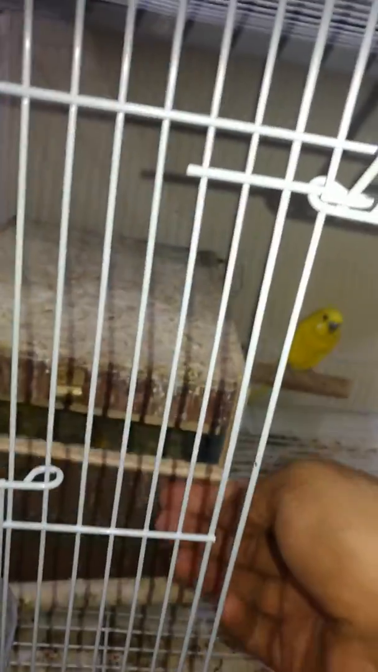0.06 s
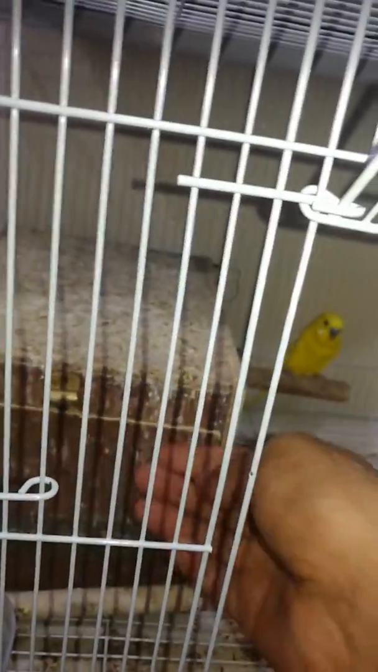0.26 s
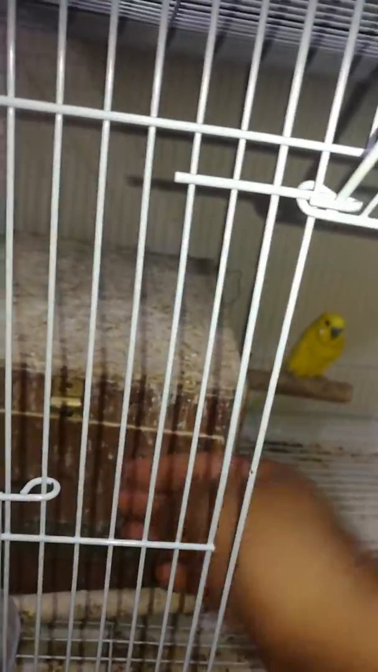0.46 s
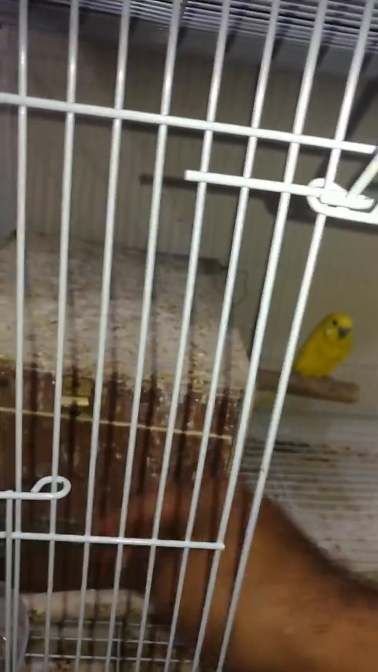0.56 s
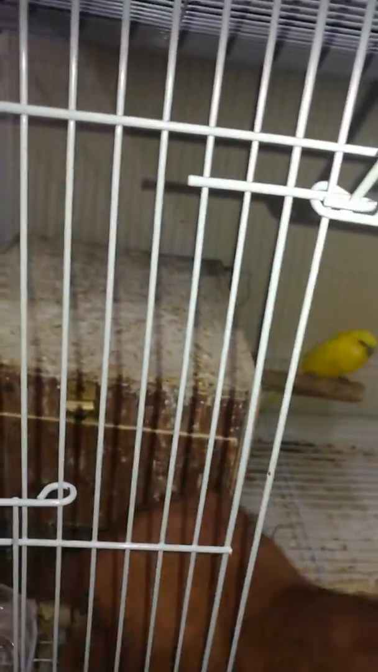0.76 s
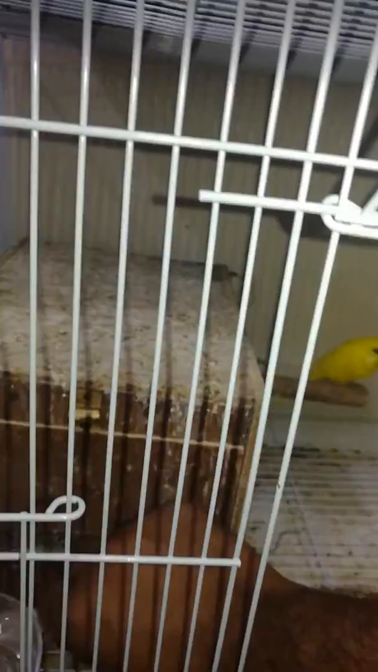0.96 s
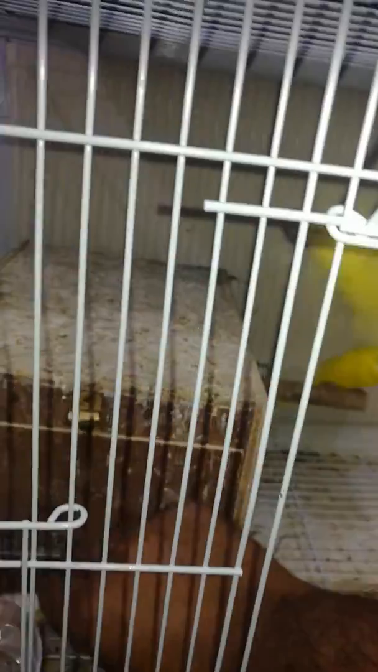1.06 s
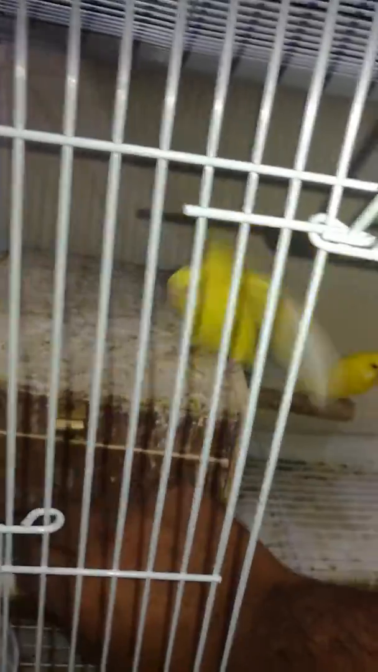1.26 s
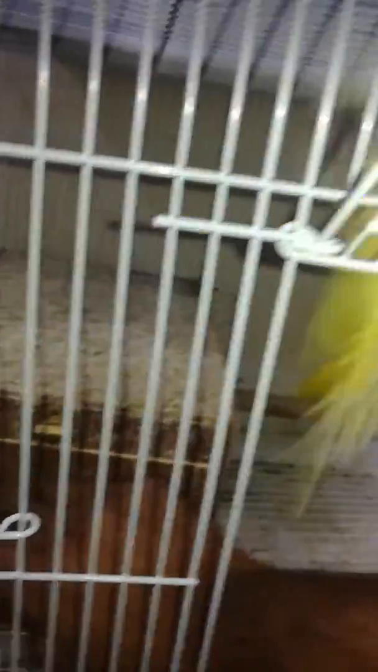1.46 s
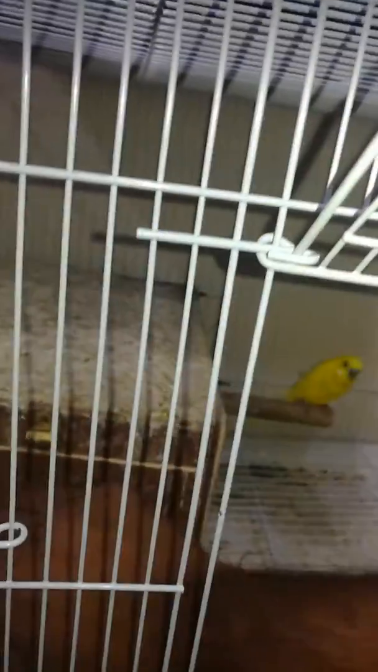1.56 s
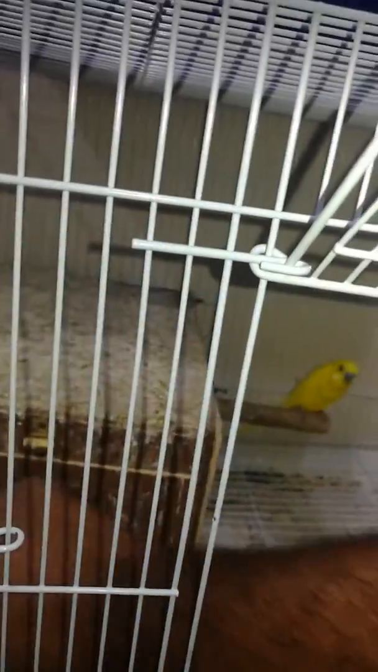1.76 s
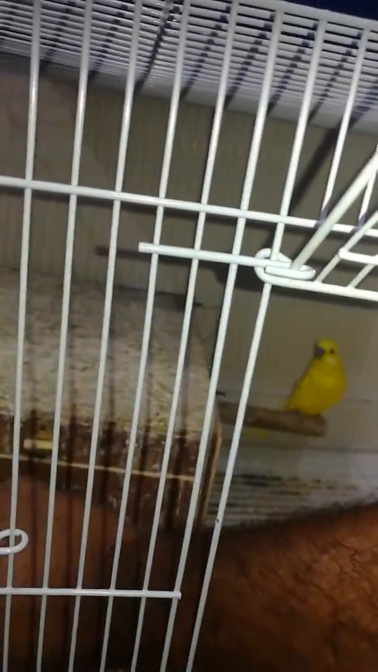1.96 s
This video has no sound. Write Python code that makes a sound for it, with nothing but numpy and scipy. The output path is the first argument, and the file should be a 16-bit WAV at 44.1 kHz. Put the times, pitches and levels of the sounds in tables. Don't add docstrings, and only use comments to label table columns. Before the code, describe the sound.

Wing flutter in a wire cage, heard close and slightly right: bumps on a hollow wooden box, a few weak flaps with air puffs, quick chirps, a dense crackling flurry, then faint wire hum and chirping.

```python
import sys
import numpy as np
from scipy import signal
from scipy.fft import rfft, irfft, next_fast_len
from scipy.io import wavfile
from scipy.ndimage import uniform_filter1d

SR = 44100
rng = np.random.default_rng(int(sys.argv[2]) if len(sys.argv) > 2 else 0)


def file_out(sig):
    cols = np.atleast_2d(sig).T
    lim = np.clip(cols, -1, 1)
    pcm = np.round(lim * 32767).astype(np.int16)
    wavfile.write(sys.argv[1], SR, pcm)


def volts_from_decibels(level):
    exponent = np.asarray(level, float) / 20
    return 10 ** exponent


N = 88200
T = np.arange(N) / SR


def unit(x):
    return x / np.sqrt(np.mean(x ** 2) + 1e-30)


def shape(x, gain_of_hz):
    size = next_fast_len(N + 8192)
    hz = np.maximum(np.fft.rfftfreq(size, 1 / SR), 1)
    return irfft(rfft(x, size) * gain_of_hz(hz), size)[..., :N]


def colour(x, table):
    hz, db = np.array(table, float).T
    return shape(x, lambda f: volts_from_decibels(np.interp(np.log(f), np.log(hz), db)))


def band(x, hz, width_hz):
    return shape(x, lambda f: 1 / (1 + 1j * (f / hz - hz / f) * hz / width_hz))


def band_noise(shape_of, hz, width_hz):
    once = band(rng.standard_normal(shape_of), hz, width_hz)
    return unit(band(once, hz, width_hz))


def walk(rate_hz):
    hold = int(SR / rate_hz)
    steps = np.repeat(rng.standard_normal(N // hold + 1), hold)
    return unit(uniform_filter1d(steps, hold)[:N])


def level(table):
    return volts_from_decibels(np.interp(T, *np.array(table, float).T))


def partial(start_s, level_db, hz, t60_s):
    t = np.maximum(T - start_s, 0)
    return volts_from_decibels(level_db - 60 * t / t60_s) * np.sin(2 * np.pi * hz * t)


def glides(notes, rough, overtone_db):
    warble_hz, beak_hz = 270, 6200
    tone, over = np.zeros((2, N))
    warble, wobble = (unit(band(rng.standard_normal(N), warble_hz, 210)) for _ in range(2))
    for start_s, length_s, start_hz, end_hz, level_db in notes:
        u = np.clip((T - start_s) / length_s, 0, 1)
        cycles = length_s * (start_hz * u + (end_hz - start_hz) * u ** 2 / 2)
        phase = 2 * np.pi * cycles + rough * wobble / 2
        env = volts_from_decibels(level_db - 2) * np.sin(np.pi * u) ** 1.23 * (1 + rough * warble)
        tone += env * np.sin(phase)
        over += env * (np.sin(2 * phase) + 0.31 * np.sin(3 * phase))
    return tone + volts_from_decibels(overtone_db) * band(over, beak_hz, 1670)


def shared_bass(f):
    return 1 / (1 + (f / 280) ** 2)


def place(x, pan_db):
    lag_s = 25 / 44100
    bass = shape(x, shared_bass)
    treble = x - bass
    left = shape(treble, lambda f: np.exp(-2j * np.pi * f * lag_s))
    return bass + np.array([left * volts_from_decibels(pan_db / 2), treble * volts_from_decibels(-pan_db / 2)])


def wide(table):
    noise = rng.standard_normal((3, N))
    apart = shape(noise[1:], lambda f: np.sqrt(1 - shared_bass(f) ** 2))
    return unit(colour(shape(noise[0], shared_bass) + apart, table))


def room(x):
    t60_s, treble_t60_s, split_hz = 0.39, 0.21, 5500
    t = T[:SR // 2]
    noise = rng.standard_normal((2, N))
    dull = shape(noise, lambda f: 1 / (1 + (f / split_hz) ** 2))
    bright = noise - dull
    tail = dull[:, :len(t)] * volts_from_decibels(-60 * t / t60_s) + bright[:, :len(t)] * volts_from_decibels(-60 * t / treble_t60_s)
    tail = tail * (t > .004)
    tail = tail / np.sqrt(np.sum(tail ** 2) / 2)
    return signal.fftconvolve(np.atleast_2d(x), tail, axes=1)[:, :N]


# hz [Hz], density_db [dB per Hz]
AIR_SPECTRUM = [(18, -42), (30, -25), (1280, -8), (1860, -38.5), (2170, 2), (2350, -28.5), (3220, -21),
                (16000, -36)]


def room_air():
    return volts_from_decibels(-73) * wide(AIR_SPECTRUM)


# pitch_hz [Hz], width_hz [Hz], level_db [dB]
SQUAWK_BANDS = [(2186, 390, 3), (2680, 530, 2.5), (4260, 960, -10), (6230, 680, -26.5)]


def squawk_tail():
    t60_s = 0.26
    tail = sum(volts_from_decibels(db) * band_noise((2, N), hz, width_hz) for hz, width_hz, db in SQUAWK_BANDS)

    def fade(start_s, level_db):
        return (T >= start_s) * volts_from_decibels(level_db - 60 * np.maximum(T - start_s, 0) / t60_s)

    return tail * (fade(0, -46.5) + fade(.366, -60.5))


# start_s [s], level_db [dB]
STIR_EFFORT = [(0, -71.5), (.5, -72.5), (.525, -58), (.63, -60.5), (.76, -59), (.83, -65.5), (.905, -62.5),
               (.93, -49.5), (1.05, -52.5), (1.15, -60.5), (1.22, -49.5), (1.3, -42.5), (1.45, -46.5),
               (1.55, -46), (1.7, -53.5), (1.79, -51), (1.86, -59), (2.0, -64)]
# hz [Hz], density_db [dB per Hz]
RUSTLE_SPECTRUM = [(150, -13), (350, -12.5), (570, -20), (1000, -15), (2400, -14.5), (3500, -27),
                   (4200, -27), (5200, -24.5), (6200, -25.5), (7300, -35.5), (16000, -36)]


def rustle():
    return level(STIR_EFFORT) * wide(RUSTLE_SPECTRUM) * volts_from_decibels(3 * walk(39.75))


# pitch_hz [Hz], width_hz [Hz], level_db [dB]
WIRE_MODES = [(821, 134, -1.5), (1268, 103, -10), (1544, 64, -17.5), (2330, 64, -18), (2530, 210, -23),
              (298, 35, -9.5)]
# start_s [s], level_db [dB]
WIRE_SHAKE = [
    (1.1, -5.5),
    (1.5, -1.5),
    (1.85, 4.5),
]


def wire_hum():
    hum = sum(volts_from_decibels(db + 2.84 * walk(24.88)) * band_noise((2, N), hz, width_hz)
              for hz, width_hz, db in WIRE_MODES)
    return level(STIR_EFFORT) * level(WIRE_SHAKE) * hum


def wire_ring(wings):
    return volts_from_decibels(-4.5) * sum(band(wings, hz, width_hz / 2) for hz, width_hz, _ in WIRE_MODES[:-1])


# start_s [s], level_db [dB]
DRAUGHT_LEVEL = [(0, -63.5), (.05, -79.5), (.5, -72), (.54, -54), (.62, -58), (.8, -60.5), (.92, -50.5),
                 (1.1, -48.5), (1.22, -61), (1.3, -45), (1.6, -46), (1.77, -54.5), (1.82, -83)]


def draught():
    hz = 72
    rumble = unit(band(band(rng.standard_normal(N), hz, 124), hz, 110))
    return level(DRAUGHT_LEVEL) * rumble * volts_from_decibels(2.85 * walk(23))


# start_s [s], length_s [s], start_hz [Hz], end_hz [Hz], level_db [dB]
PANEL_CREAKS = [
    (.125, .055, 234, 144, -40),
    (.262, .075, 184.7, 150, -44.5),
]


def creaks():
    return glides(PANEL_CREAKS, rough=.1, overtone_db=-60)


# start_s [s], level_db [dB], contact_s [s]
BOX_BUMPS = [
    (0.132, -44.5, 0.0013),
    (0.213, -19, 0.00079),
    (.232, -22, 0.012),
    (0.265, -37.5, 0.0018),
    (.303, -38, 0.0016),
    (0.361, -30, 0.0076),
    (0.386, -37, 0.0041),
    (0.424, -50, 0.0062),
]
# pitch_hz [Hz], level_db [dB], t60_s [s]
BOX_MODES = [(137, 4.5, 0.14), (185.5, 4.5, 0.064), (414.5, -13.5, 0.087), (826, 7, 0.063),
             (1232, -6, 0.042)]


def box_bumps():
    cut_hz, rattle_db, rattle_s = 149, -11.5, 0.028
    t = T[:SR // 4]
    modes = sum(volts_from_decibels(db - 60 * t / t60_s) * np.sin(2 * np.pi * hz * t) for hz, db, t60_s in BOX_MODES)
    seams = unit(band(rng.standard_normal(N), 1100, 1500))[:len(t)]
    knock = modes + volts_from_decibels(rattle_db) * np.exp(-t / rattle_s) * seams
    push = np.zeros(N)
    for start_s, level_db, contact_s in BOX_BUMPS:
        push += volts_from_decibels(level_db) * np.exp(-((T - start_s) / contact_s) ** 2 * 8) / (contact_s * SR * 0.68)

    def low_cut(f):
        r = f / cut_hz
        return (1j * r) ** 4 / (1 + 1.4j * r - r ** 2) ** 2

    return shape(signal.fftconvolve(push, knock)[:N], low_cut)


# hz [Hz], density_db [dB per Hz]
FEATHER_SPECTRUM = [(120, -10), (200, 1.5), (1160, -5.5), (1770, 0.5), (2380, -5.5), (3830, -7),
                    (4520, -6.5), (5840, -6), (16000, -15)]


def feather_noise():
    split_hz, snaps_per_s, spread_db = 6900, 2500, 4.5
    hits = rng.random((2, N)) < snaps_per_s / SR
    size = volts_from_decibels(spread_db * np.minimum(rng.exponential(size=(2, N)), 2.5))
    snaps = hits * size * rng.standard_normal((2, N))
    parts = []
    for snap, side in zip(snaps, (1, -1)):
        raw = colour(place(unit(snap), 0) + rng.standard_normal((2, N)), FEATHER_SPECTRUM)
        parts.append(shape(raw, lambda f: 1 / (1 + (f / split_hz) ** (6 * side))))
    return np.array(parts) / np.std(sum(parts))


# start_s [s], level_db [dB], swish_s before the crack [s], bright_db [dB]
WING_STROKES = [(0.364, -44.5, 0.00035, -19), (0.52, -55.5, 0.00021, -6), (0.567, -54, 0.0035, -2),
                (0.611, -40, 0.0008, 1), (.755, -48.5, 0.0053, -2.5), (0.919, -35.5, 0.0012, -3),
                (0.971, -39, 0.0029, -10), (1.083, -53.5, 0.011, -2), (1.277, -34.5, 0.0018, -6.5),
                (1.297, -43.5, 0.0035, -11), (1.326, -55, 0.018, 12.5), (1.381, -30, 0.003, 3),
                (1.409, -35, .003, -7), (1.427, -23.5, 0.003, 0.5), (1.44, -53, .002, -3),
                (1.463, -51.5, 0.0008, 8), (1.4796, -29, 0.004, 3.5), (1.489, -40, .004, -12),
                (1.517, -44, 0.001, 14), (1.528, -27.5, 0.0025, -5.5), (1.638, -37.5, 0.001, -3),
                (1.645, -41, .002, -5.5), (1.692, -39.5, 0.0015, -4.5), (1.7413, -32.5, 0.0002, 0.5),
                (1.745, -31.5, .001, -6)]


def strokes():
    crack_s, ruffle_db, dark_ruffle_s, bright_ruffle_s = 0.0034, -21.5, 0.039, 0.015
    dark, bright = feather_noise()
    out = np.zeros((2, N))
    for start_s, level_db, swish_s, bright_db in WING_STROKES:
        after = np.maximum(T - start_s, 0)
        swish = np.exp(np.minimum(T - start_s, 0) / max(swish_s, 1e-4))
        crack = np.exp(-after / crack_s)
        dark_env = swish * (crack + volts_from_decibels(ruffle_db) * np.exp(-after / dark_ruffle_s))
        bright_env = swish * (crack + volts_from_decibels(ruffle_db) * np.exp(-after / bright_ruffle_s))
        out += volts_from_decibels(level_db) * (dark * dark_env + bright * volts_from_decibels(bright_db) * bright_env)
    return out


# start_s [s], level_db [dB], pitch_hz [Hz]
QUILL_SNAPS = [(.9187, -42, 5200), (1.2772, -41, 5500), (1.3725, -29.5, 9200), (1.3794, -30, 10200),
               (1.3787, -26, 11100), (1.3825, -45, 4320), (1.4072, -42, 7200), (1.4273, -16, 4300),
               (1.4273, -23, 8000), (1.4403, -29, 5200), (1.4797, -25.5, 4230), (1.4786, -28.5, 7600),
               (1.518, -32, 12100), (1.5274, -28.5, 4270), (1.5277, -36.5, 8200), (1.5325, -39, 4720),
               (1.7414, -36, 8600), (1.7444, -19, 3570), (0.518, -54, 1800), (.969, -37, 4090),
               (1.888, -38, 3270)]


def quills():
    cycles = 11
    return place(sum(partial(start_s, db, hz, cycles / hz) for start_s, db, hz in QUILL_SNAPS), 0)


# start_s [s], level_db [dB], length_s [s]
AIR_PUFFS = [(0.526, -45.5, 0.0093), (0.574, -44, .022), (0.888, -44, .022), (1.343, -38, 0.014),
             (0.702, -38.5, 0.02), (0.763, -32, 0.011), (0.818, -38.5, 0.016), (.934, -34, 0.013),
             (0.947, -32, 0.009), (0.971, -34.5, 0.0065), (0.987, -38, 0.014), (1.001, -31.5, .008),
             (1.039, -36.5, 0.011), (1.05, -40.5, 0.0072), (1.102, -47, .02), (1.155, -47, 0.01),
             (1.285, -42, 0.012), (1.299, -30.5, 0.0062), (1.326, -24, 0.018), (1.378, -19, 0.0094),
             (1.427, -30.5, 0.015), (1.458, -28.5, 0.0056), (1.481, -29.5, 0.0048), (1.494, -37, 0.01),
             (1.511, -36, 0.0045), (1.519, -30.5, 0.0092), (1.56, -33.5, 0.011), (1.574, -35.5, 0.014),
             (1.593, -34, 0.01), (1.625, -37, 0.033), (1.68, -44, 0.022), (1.741, -47, 0.013)]


def puffs():
    rebound = 0.72
    out = np.zeros(N)
    for start_s, level_db, length_s in AIR_PUFFS:
        suck = np.exp(-((T - start_s) / (length_s / 5.3)) ** 2)
        push = np.exp(-((T - start_s - length_s / 2) / (length_s / 2.24)) ** 2)
        out += volts_from_decibels(level_db) * (rebound * push - suck)
    return shape(out, lambda f: 1j * f / (1j * f + 25))


# start_s [s], length_s [s], start_hz [Hz], end_hz [Hz], level_db [dB]
CLEAR_NOTES = [(.62, 0.063, 740, 685, -47), (0.677, 0.017, 2437, 2560, -41.5),
               (0.808, 0.017, 1383, 1320, -52), (1.054, 0.01, 2824, 2620, -38),
               (1.067, 0.023, 2530, 2375, -36), (1.129, 0.014, 1902, 1955, -29.5),
               (1.143, 0.015, 1785, 1586, -34), (1.148, 0.01, 2085, 1920, -38),
               (1.158, 0.015, 2130, 1885, -45.5), (1.214, 0.0118, 2586, 2080, -38)]
# start_s [s], length_s [s], start_hz [Hz], end_hz [Hz], level_db [dB]
HOARSE_NOTES = [(.608, 0.0089, 3240, 3240, -48.5), (.615, 0.016, 3440, 4320, -51),
                (.626, 0.012, 3200, 3270, -49.5), (.645, .018, 3360, 3260, -58),
                (1.084, 0.0074, 3370, 2880, -47), (1.107, 0.016, 2756, 2400, -36),
                (1.113, 0.009, 2320, 1990, -44), (1.118, 0.011, 2660, 2820, -48),
                (1.226, 0.013, 2340, 1910, -43.5), (1.12, 0.02, 3324, 2700, -50),
                (1.890, 0.024, 2470, 2674, -44.5), (1.910, 0.0065, 2390, 2720, -42.5),
                (1.918, 0.02, 3200, 2630, -44), (1.922, 0.049, 3150, 3020, -48.5),
                (1.930, 0.021, 2754, 2580, -49.5), (1.944, 0.016, 2432, 2290, -41),
                (1.957, 0.014, 1907, 1760, -56.5), (1.975, 0.028, 2307, 2350, -52.5)]


def chirps():
    clear = glides(CLEAR_NOTES, rough=.25, overtone_db=-19)
    return clear + glides(HOARSE_NOTES, rough=.42, overtone_db=-9)


# start_s [s], level_db [dB], pitch_hz [Hz]
WING_CLAPS = [(1.2243, -35, 1046), (1.278, -33, 1200), (1.278, -36, 2130), (1.2949, -32.5, 990),
              (1.3021, -35, 970), (1.383, -31.5, 1790), (1.425, -38, 1860), (1.4657, -31.5, 1990),
              (1.4895, -37, 1950), (1.528, -34, 2040), (1.7445, -32, 2285), (1.8885, -43, 1100),
              (1.376, -28, 780), (1.419, -24.5, 420), (1.426, -25, 670), (1.477, -25.5, 784),
              (1.479, -19.5, 1787), (1.527, -33, 805)]


def claps():
    return sum(partial(start_s, db, hz, t60_s=0.018) for start_s, db, hz in WING_CLAPS)


def scene():
    wings = strokes() + claps() + quills()
    wood = box_bumps() + creaks()
    calls = chirps()
    wet = volts_from_decibels(-10.5) * wings[1] + volts_from_decibels(-24) * wood + volts_from_decibels(-4) * calls
    birds = wings + puffs() + place(calls, pan_db=-9.5)
    cage = wire_ring(wings) + rustle() + wire_hum() + draught() + place(wood, 0)
    return birds + cage + room(wet) + squawk_tail() + room_air()


# hz [Hz], left_minus_right_db [dB]
PORT_TILT = [(700, 0), (1300, -6), (2500, -6), (4400, -6), (8000, -1.5), (13000, -2)]


def ports(dry):
    return np.array([colour(x, [(hz, side * db / 2) for hz, db in PORT_TILT])
                     for x, side in zip(dry, (1, -1))])


def top_cut(x):
    return signal.sosfilt(signal.butter(12, 16660, fs=SR, output="sos"), x)


def record(dry):
    top_hz = 16300
    return top_cut(shape(ports(dry), lambda f: f < top_hz))


dry = scene()
out = record(dry)
file_out(out)
```